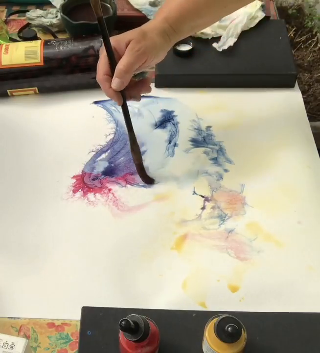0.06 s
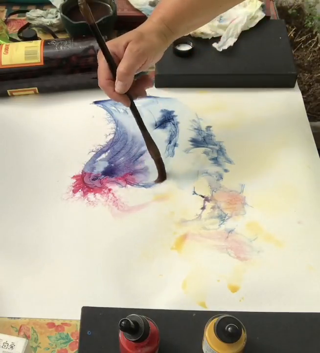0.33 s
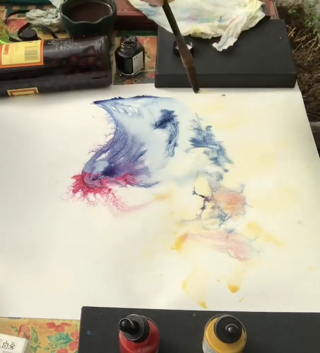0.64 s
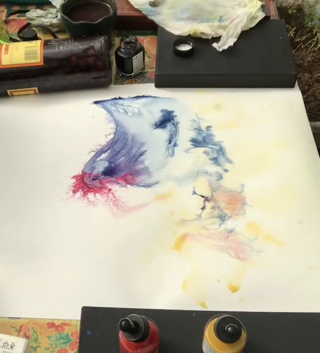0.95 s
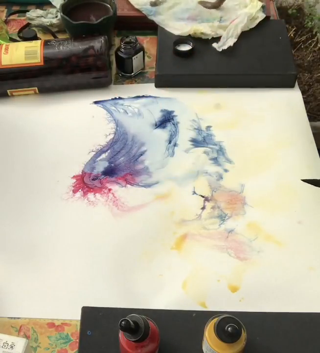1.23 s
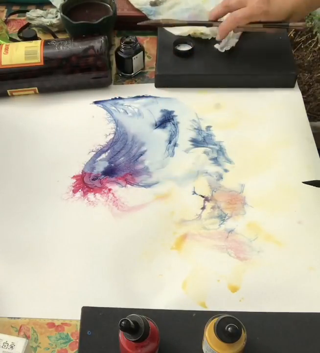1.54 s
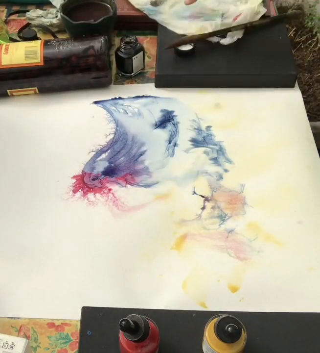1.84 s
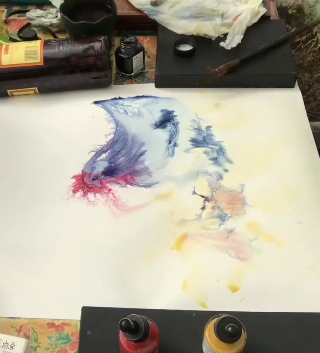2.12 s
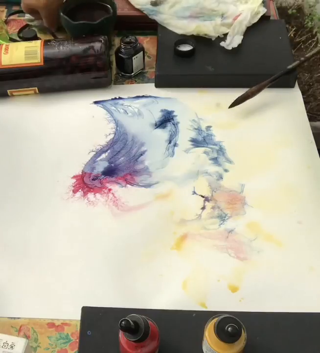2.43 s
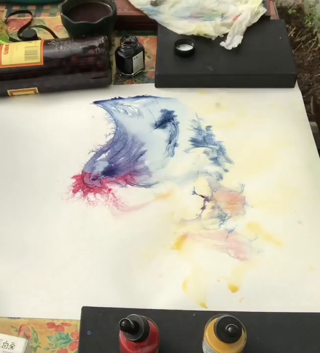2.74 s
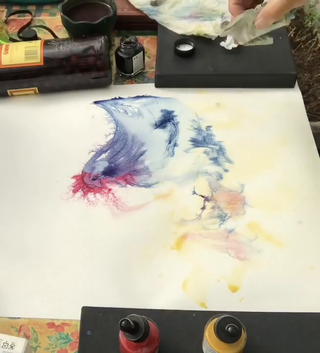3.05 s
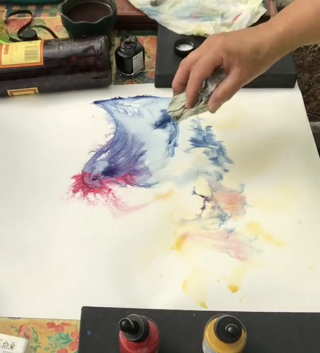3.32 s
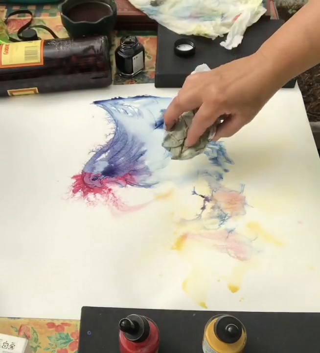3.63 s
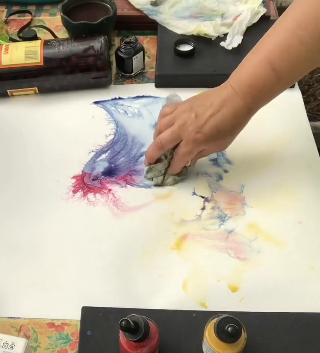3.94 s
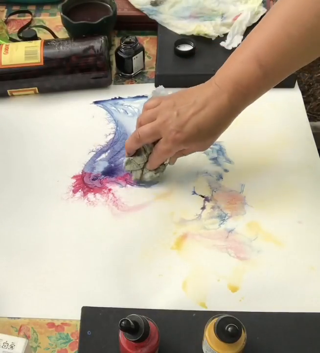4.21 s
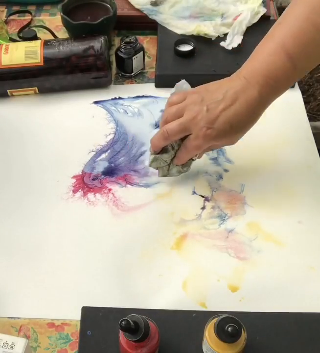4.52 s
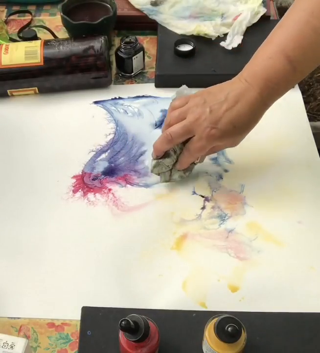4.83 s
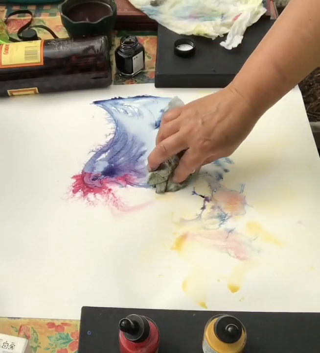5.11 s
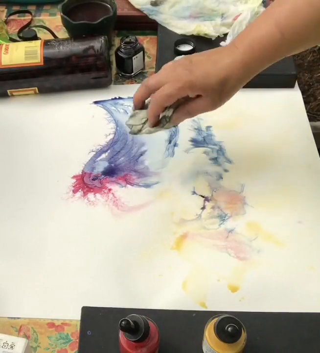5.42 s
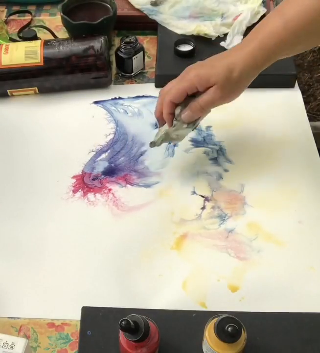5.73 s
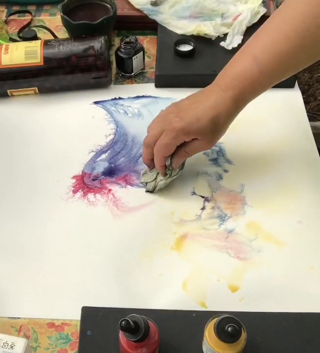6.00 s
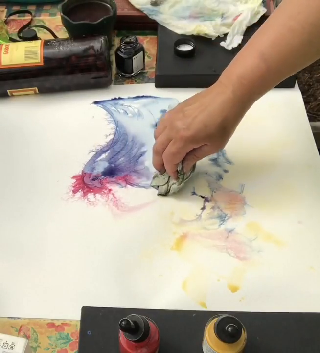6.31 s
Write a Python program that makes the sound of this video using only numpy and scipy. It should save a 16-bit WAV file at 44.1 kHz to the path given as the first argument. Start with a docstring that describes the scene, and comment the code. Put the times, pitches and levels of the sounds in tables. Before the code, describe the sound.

A paintbrush is put down with a thud and clatter on a table, then tissue softly dabs wet paper, outdoors.

```python
"""Painting at an outdoor table, over a distant rumble and a few faint high chirps.
0-0.6 s: soft brush strokes on paper. 1.7-2.1 s: the brush is put down with a thud on the table top,
a clink of its handle on a hard pot and a wooden clack. 2.3-4 s: things are nudged and tapped while a
tissue is wadded, its fibres catching and slipping. 3.7-6.3 s: the tissue dabs the wet paper with small
ticks and, near 6 s, one thin stick-slip squeak."""
import sys
import numpy as np
from scipy import signal
from scipy.fft import rfft, irfft
from scipy.io import wavfile
from scipy.ndimage import uniform_filter1d

SR = 44100
rng = np.random.default_rng(int(sys.argv[2]) if len(sys.argv) > 2 else 0)


def pcm_store(signal):
    """Save signal as 16-bit PCM."""
    levels = np.round(np.clip(np.atleast_2d(signal), -1, 1) * 32767)
    wavfile.write(sys.argv[1], SR, levels.astype(np.int16).T)


N = 280476
TIME_S = np.arange(N) / SR

# outdoor noise spectrum: freq_hz, density_db
AIR_SPECTRUM = [(15, -40), (25, -5.5), (105, -3), (277, -9), (677, -18.5), (911, -21.5), (1040, -19.5),
                (1230, -20.5), (1940, -26), (2160, -25.5), (2610, -29), (2990, -30), (4100, -32),
                (5000, -34.5), (6300, -32.5), (7710, -37), (14400, -40.5), (16000, -39)]
# far machinery: freq_hz, width_hz, level_db
MACHINE_DRONE = [(86, 9, -65), (128.4, 8.8, -68.5), (184, 25, -64.5), (270.6, 64, -66.5)]
# faint chirps: start_s, length_s, pitch_hz, level_db
HIGH_CHIRPS = [(.865, 0.062, 6700, -68), (2.72, 0.063, 11500, -66), (2.74, 0.085, 6580, -60.5),
               (5.708, 0.033, 6460, -58)]

# short bright rustles of hand, cloth and tissue: peak_s, length_s, level_db
SHORT_RUSTLES = [(1.07, 0.046, -60.5), (1.12, 0.074, -64), (1.288, .06, -65), (1.385, 0.15, -62),
                 (1.674, 0.021, -47.5), (1.745, 0.13, -47), (1.856, 0.061, -49.5), (2.525, 0.032, -51),
                 (3.30, 0.074, -49.5), (5.73, 0.037, -65)]
# tissue picked up and wadded: time_s, hiss_db, body_db
TISSUE_WADDING = [(2.284, -74, -66), (2.305, -54.5, -53), (2.38, -53, -62), (2.45, -62.5, -53.5),
                  (2.74, -60.5, -58.5), (2.93, -56, -59), (3.24, -60.5, -55.5), (3.30, -58, -51.5),
                  (3.36, -59.5, -56.5), (3.571, -57.5, -57.5), (3.615, -66, -64)]
# tissue presses, wipes, lifts: peak_s, length_s, level_db
TISSUE_DABS = [(3.72, 0.16, -59), (3.98, 0.15, -53.5), (4.155, 0.095, -57), (4.385, 0.058, -53),
               (4.478, 0.075, -56.5), (4.73, 0.093, -59), (4.86, 0.089, -62), (4.945, 0.059, -61),
               (5.024, 0.026, -57), (5.135, 0.22, -60.5), (5.372, .05, -63), (5.56, 0.26, -57.5),
               (5.80, 0.22, -54), (5.95, 0.14, -59.5), (6.025, 0.044, -48.5), (6.08, 0.19, -59.5),
               (6.235, 0.079, -57.5), (6.308, 0.074, -58.5)]
# bright part of a rub: freq_hz, density_db
RUB_HISS_SPECTRUM = [(1500, -24.5), (2500, -6.5), (3500, -3), (4200, -5), (5000, -8.5), (5900, -7),
                     (6800, -8), (9000, -15), (12000, -16.5), (16000, -19)]
# dull part of a rub: freq_hz, density_db
RUB_BODY_SPECTRUM = [(250, -18.5), (600, 0.5), (1200, 4), (2100, -0.5), (3000, -2), (4500, -17)]
# snaps of cloth and wet tissue: start_s, level_db, pitch_hz, width_hz
TISSUE_SNAPS = [(1.0654, -59, 4000, 9100), (1.2756, -55.5, 6000, 9000), (1.396, -50, 5040, 7000),
                (3.6870, -43, 2400, 3500), (3.807, -51.5, 5010, 9000), (4.712, -54, 4500, 6000),
                (4.776, -54, 4000, 6000), (4.8900, -52.5, 5500, 8000), (5.022, -52, 3200, 4000),
                (5.102, -55, 3500, 5000), (5.376, -54, 4500, 5000), (5.5587, -42, 2930, 4000),
                (5.631, -39, 8460, 3000), (5.6733, -47, 3300, 1500), (5.6817, -45, 3300, 1500),
                (5.726, -38, 2930, 1000), (5.9860, -49, 2700, 700), (6.2273, -46, 2750, 600)]
# course of the squeak: time_s, scrape_db, tone_db, pitch_hz, upper_hz
SQUEAK_GLIDE = [(5.87, -68, -75, 4600, 5600), (5.915, -49, -58, 4560, 5700), (5.924, -46, -44, 4500, 5700),
                (5.937, -44, -45, 4750, 5750), (5.948, -38, -36.5, 4900, 6100),
                (5.962, -42, -37, 4900, 5950), (5.969, -44, -46, 4950, 5850), (5.992, -46, -47, 4800, 5600),
                (6.006, -47, -49, 4560, 5250), (6.019, -52, -38, 4420, 5200), (6.03, -55, -54, 4400, 5200),
                (6.06, -72, -72, 4380, 5200)]
# steady resonances of the squeak: freq_hz, width_hz, level_db
SQUEAK_RESONANCES = [(4450, 260, -12), (5600, 1200, -13), (6200, 300, -12), (7100, 1700, -11),
                     (8000, 900, -14), (8630, 400, -10), (9700, 980, -16.5), (12230, 2500, -17)]

# taps of a hard handle, pitch set by the grip: start_s, level_db, pitch_ratio
HANDLE_TAPS = [(0.8985, -43.5, 0.95), (2.6257, -29, 0.98), (2.6794, -27.5, 0.93), (2.8083, -38.5, 1.04),
               (5.036, -39, 0.76)]
# hollow ring of the handle: freq_hz, level_db, t60_s
HANDLE_MODES = [(1026, 2, 0.016), (1340, -2, .02), (1680, -6, .012), (2400, -13, .008),
                (2980, -3.5, 0.0072), (5300, -7, .003)]
# contact of handle and pot: freq_hz, density_db
CLINK_SPECTRUM = [(1500, -44.5), (2300, -31), (2800, -8), (3300, -9), (3900, 2), (4500, 1.5), (5200, -19),
                  (6200, -6.5), (7000, -19), (7900, -12.5), (8800, -28.5), (10200, -15.5), (13400, -33.5),
                  (16000, -31)]
# ring of the pot: freq_hz, level_db, t60_s
POT_MODES = [(2640, -22, 0.26), (2982, -17, 0.26), (3520, -19, 0.21), (3770, -11, .22), (3900, 0, 0.12),
             (3870, -12.5, 0.2), (4200, -12, .28), (4314, -8, .3), (4373, -12.5, 0.273), (4470, -7, .25),
             (4520, -9.5, .28), (4730, -10, .22), (5276, -19.5, .25), (6120, -7, 0.14), (6218, -15, 0.24),
             (6540, -18.5, 0.12), (7400, -25.5, .2), (7960, -18.5, 0.25), (9020, -24, 0.16),
             (10200, -21, .12), (12240, -25.5, .14), (15400, -28, .1)]

# blows on the table: start_s, force_db, contact_ms, bass_db, rattle_db, t60_ratio, tool_hz, tool_db
TABLE_BLOWS = [(1.0652, -54, .2, 0, -7, 1.1, 520, 9), (1.6864, -12, 0.42, 4.5, -4.5, 1.22, 3800, 9),
               (1.832, -25, 0.82, -34, -3, 1.4, 560, 8), (1.8420, -30, 0.94, -22, -5, 0.92, 950, 10),
               (1.8846, -22, 1, -24, -2, 1, 597, 5.5), (1.9099, -26, 0.43, -15, 3.5, 0.84, 1400, 1),
               (1.9203, -14, 0.26, -3, -6, 0.76, 1530, 6), (1.9362, -28, 0.27, -8, 1, 0.54, 1700, 1),
               (1.9470, -23, 0.59, 2, -1, 0.93, 650, 4), (1.9842, -26, 0.56, -10, -3, 0.85, 500, 6),
               (1.9912, -23.5, 0.48, -3, -3, 0.97, 500, 7.5), (2.0413, -4.5, 0.32, -4, -10, 0.57, 2490, 9),
               (2.0512, -23, 0.36, -6, -0.5, 1.2, 426, 9.5), (2.2610, -37.5, 1.24, 2, 7.5, 1, 450, 1.5),
               (2.3070, -37.5, 1, -4, 6.5, 1, 400, 5), (2.3660, -47.5, 0.098, 0, 11.5, 0.93, 130, 13),
               (2.4050, -41, 0.7, 5, 5, 0.85, 600, 7), (2.6877, -35.5, 0.27, 15, -3, 0.99, 317, 5),
               (3.1083, -24.5, 0.22, 3, -2, 0.64, 235, 7), (3.1460, -22.5, 0.62, 8, -10.5, 0.52, 654, 7),
               (3.1551, -34, 0.35, 11, -1, 0.57, 500, 3.5), (3.1964, -39.5, .2, 8, -1, 0.65, 1910, 12),
               (3.5130, -42.5, 0.26, 15, 0.5, 0.61, 1700, 6), (3.9624, -42.5, 0.12, -16, -5, 1.1, 2000, 7),
               (3.9896, -37.5, 0.27, -17, -6, 0.92, 1096, 6), (6.0270, -38, .2, -3.5, -6.5, 0.65, 980, 8.5)]
# table top with its load: freq_hz, level_db, t60_s
TABLE_MODES = [(127.8, -31.5, 0.28), (277, -7.5, 0.028), (365, -1.5, 0.039), (526, -1, 0.024),
               (660, -5, 0.024), (878, -5.5, 0.026), (1140, -4, 0.029), (1556, -2.5, 0.02),
               (2070, -5.5, 0.014), (2750, -3, 0.01185), (3550, -2.5, 0.007), (4400, -5.5, 0.009),
               (6300, -11.5, 0.016), (8620, -10, 0.0026), (11960, -19, 0.0023)]
# dense after-rattle of table and surroundings: freq_hz, density_db, t60_s
RATTLE_BANDS = [(30.4, -41.5, .5), (69.4, -35, 0.34), (151, -16, 1), (250, -5.5, 0.55), (450, -6, 0.55),
                (745, -6, 0.44), (1060, -8, 0.47), (1482, -10.5, 0.36), (1995, -15, 0.34), (2700, -16, .38),
                (3980, -19, 0.34), (7000, -12.5, 0.23), (15040, -31.5, 0.11)]
# boards and boxes on the table: freq_hz, level_db, t60_s
BOARD_MODES = [(297, -15.5, 0.39), (365.7, -8, 0.33), (426, -13.5, .5), (469, -11, .38), (525, -10, .4),
               (634, -13, 0.39), (739, -16, .27), (850, -13.5, 0.29), (970, -17, .43), (1140, -12.5, .3),
               (1360, -17.5, .4), (1580, -18.5, 0.36)]


def amp(db):
    """Decibels to gain."""
    return np.exp(np.asarray(db) * (np.log(10) / 20))


def unit(x):
    """Scale to rms 1."""
    return x / np.sqrt(np.mean(x ** 2) + 1e-20)


def lookup(table, hz, column=1):
    """Interpolate a table column over log frequency."""
    columns = np.transpose(table)
    return np.interp(np.log(hz + 1), np.log(columns[0] + 1), columns[column])


def add(mix, start_s, sound):
    """Mix a sound in at start_s."""
    part = mix[round(start_s * SR):][:len(sound)]
    part += sound[:len(part)]


def colour(x, spectrum):
    """Filter by a spectrum; rms 1."""
    gain = amp(lookup(spectrum, np.fft.rfftfreq(len(x), 1 / SR)))
    return unit(irfft(rfft(x) * gain, len(x)))


def click(spectrum, size=1024):
    """Minimum-phase pulse of a spectrum; peak 1."""
    log_gain = np.log(amp(lookup(spectrum, abs(np.fft.fftfreq(size, 1 / SR)))))
    pulse = np.fft.ifft(np.exp(np.conj(signal.hilbert(log_gain)))).real
    return pulse / abs(pulse).max()


def resonate(x, hz, width_hz):
    """Steep resonance; its centre may move."""
    carrier = np.exp(2j * np.pi * np.cumsum(hz * np.ones(len(x))) / SR)
    pole = np.exp(-np.pi * width_hz / SR)
    baseband = signal.lfilter([(1 - pole) ** 2], [1, -2 * pole, pole * pole], x / carrier)
    return 2 * (carrier * baseband).real


def narrow_noise(hz, width_hz, size):
    """Noise through one resonance; rms 1."""
    return unit(resonate(rng.standard_normal(size), hz, width_hz))


def wander(rate_hz, size=N):
    """Smooth random curve, low-passed at rate_hz; rms 1."""
    rolloff = 1 + (np.fft.rfftfreq(size, 1 / SR) / rate_hz) ** 4
    return unit(irfft(rfft(rng.standard_normal(size)) / rolloff, size))


def echo_tail(spectrum, decays, rise_s, size=16384):
    """Dense echoes swell, then die band by band. Rows of decays: freq_hz first, t60_s last."""
    noise = colour(rng.choice([-1., 1.], size), spectrum)
    hz, t, bands = signal.stft(noise, SR, nperseg=512)
    t60_s = lookup(decays, hz, column=-1)[:, None]
    echoes = signal.istft(bands * amp(-60 * t / t60_s), SR, nperseg=512)[1][:size]
    return echoes * (1 - np.exp(-(np.arange(size) / SR / rise_s) ** 2))


def outdoors(air_db=-55.5, swell_db=1.8, rumble_below_hz=350):
    """Distant rumble swells under a steady hiss; far machinery drones."""
    air = amp(air_db) * colour(rng.standard_normal(N), AIR_SPECTRUM)
    rumble = irfft(rfft(air) / (1 + (np.fft.rfftfreq(N, 1 / SR) / rumble_below_hz) ** 4), N)
    swell = amp(swell_db * wander(rate_hz=8))
    drone = sum(amp(db) * narrow_noise(hz, width_hz, N) for hz, width_hz, db in MACHINE_DRONE)
    return air + rumble * (swell - 1) + drone


def chirps(width_hz=350):
    """Thin fuzzy tones that swell and fade."""
    out, t = np.zeros(N), np.arange(SR // 4) / SR
    for start_s, length_s, hz, db in HIGH_CHIRPS:
        envelope = np.sin(np.pi * np.minimum(t / length_s, 1))
        add(out, start_s, amp(db) * envelope * narrow_noise(hz, width_hz, len(t)))
    return out


def brush_strokes(count=7, first_s=0.045, period_s=0.0828, length_s=0.075, first_db=-72, step_db=1):
    """Brush works to and fro, pressing harder each time. Rows: peak_s, length_s, level_db."""
    return [(first_s + k * period_s, length_s, first_db + k * step_db) for k in range(count)]


def rub_power(rubs, rise_share=0.39, edge_db=12, roundness=1.34):
    """Power envelope of a set of rubs: quick rise, slower fade."""
    power = np.zeros(N)
    for peak_s, length_s, db in rubs:
        near = abs(TIME_S - peak_s) < 2 * length_s
        offset = (TIME_S[near] - peak_s) / length_s
        distance = np.maximum(-offset / rise_share, offset / (1 - rise_share))
        power[near] += amp(db - edge_db * distance ** roundness) ** 2
    return power


def crinkle(centre_hz=2000, width_hz=800, drift_octaves=0.19, folds_per_s=500, spread_db=2.5):
    """Tissue folds buckle and ring; the pitch drifts as the wad changes shape."""
    folds = rng.choice([-1., 1.], N) * (rng.random(N) < folds_per_s / SR)
    folds *= amp(spread_db * np.minimum(rng.exponential(1, N), 4))
    pitch_hz = centre_hz * 2 ** (drift_octaves * wander(rate_hz=9))
    return unit(resonate(folds, pitch_hz, width_hz))


def rubbing(hiss_db=-1, body_db=-3, crinkle_db=-7, spread_db=1.5, clump_db=1.25, slips_per_s=4000):
    """Brush, cloth and tissue fibres catch and slip in clumps: bright hiss, dull body, crinkle."""
    times_s, *levels_db = np.transpose(TISSUE_WADDING)
    hiss_power, body_power = (amp(np.interp(TIME_S, times_s, db, left=-np.inf, right=-np.inf)) ** 2
                              for db in levels_db)
    for rubs, body_over_hiss_db in [(brush_strokes(), 3), (SHORT_RUSTLES, -5), (TISSUE_DABS, 2)]:
        power = rub_power(rubs)
        hiss_power += power
        body_power += power * amp(body_over_hiss_db) ** 2
    clumps = amp(clump_db * wander(rate_hz=35))
    out = np.zeros(N)
    for spectrum, power, db in [(RUB_HISS_SPECTRUM, hiss_power, hiss_db),
                                (RUB_BODY_SPECTRUM, body_power, body_db)]:
        slips = rng.standard_normal(N) * (rng.random(N) < slips_per_s / SR)
        slips *= clumps * amp(spread_db * np.minimum(rng.exponential(1, N), 5))
        out += amp(db) * np.sqrt(power) * colour(slips, spectrum)
    return out + amp(crinkle_db) * np.sqrt(body_power) * crinkle()


def tissue_ticks(spray_db=-15, decay_s=0.0023):
    """Each snap: a short puff through one resonance, plus broadband spray."""
    out, t = np.zeros(N), np.arange(4096) / SR
    for start_s, db, hz, width_hz in TISSUE_SNAPS:
        noise = rng.standard_normal(len(t))
        puff = unit(resonate(noise, hz, width_hz)) + amp(spray_db) * noise
        add(out, start_s, amp(db) * np.exp(-t / decay_s) * puff)
    return out


def squeak(width_hz=280, lower_db=-6, upper_db=-10, rings_db=-2, rasp_db=2, jitter_hz=90):
    """Stick-slip contact: two rough gliding tones stutter over steady high resonances."""
    times_s, *columns = np.transpose(SQUEAK_GLIDE)
    out, size = np.zeros(N), SR // 4
    t = times_s[0] + np.arange(size) / SR
    scrape_db, tone_db, pitch_hz, upper_hz = (np.interp(t, times_s, column) for column in columns)
    pitch_hz += jitter_hz * wander(rate_hz=250, size=size)
    lower = amp(lower_db + tone_db) * narrow_noise(pitch_hz, width_hz, size)
    rings = sum(amp(db) * narrow_noise(hz, band_hz, size) for hz, band_hz, db in SQUEAK_RESONANCES)
    upper = amp(upper_db) * narrow_noise(upper_hz, width_hz, size)
    scrape = amp(scrape_db) * (amp(rings_db) * rings + upper)
    rasp = unit(amp(rasp_db * wander(rate_hz=180, size=size)))
    add(out, times_s[0], (t < times_s[-1]) * rasp * (lower + scrape))
    return out


def handle_taps(attack_s=0.00029, echo_db=-18, echo_t60_s=0.18):
    """Light taps ring the handle; the surroundings answer faintly."""
    out, t = np.zeros(N), np.arange(4096) / SR
    echo_spectrum = [(500, -10), (1100, 3), (3000, -9), (9000, -33)]  # freq_hz, density_db
    for start_s, tap_db, pitch_ratio in HANDLE_TAPS:
        ring = sum((-1) ** k * amp(db - 60 * t / t60_s) * np.sin(2 * np.pi * pitch_ratio * hz * t)
                   for k, (hz, db, t60_s) in enumerate(HANDLE_MODES))
        add(out, start_s, amp(tap_db) * ring * (1 - np.exp(-t / attack_s)))
        echo = echo_tail(echo_spectrum, [(1000, echo_t60_s)], rise_s=0.0019)
        add(out, start_s, amp(tap_db + echo_db) * echo)
    return out


def pot_clink(start_s=1.9207, bounces=6, gap_s=0.0007, loss_db=2,
              crack_db=-5, ring_db=-26, echo_db=-31, wobble_hz=12):
    """The handle chatters on the pot, each bounce weaker; the pot rocks, so its modes waver."""
    out, t = np.zeros(N), np.arange(SR // 2) / SR
    for k in range(bounces):
        bounce_s = start_s + gap_s * (k + 0.5 * rng.random())
        add(out, bounce_s, amp(crack_db - loss_db * k) * click(CLINK_SPECTRUM))
    for hz, db, t60_s in POT_MODES:
        detune_hz = wobble_hz * unit(uniform_filter1d(rng.standard_normal(len(t)), size=400))
        cycles = np.cumsum(hz + detune_hz) / SR + rng.random()
        add(out, start_s, amp(ring_db + db - 60 * t / t60_s) * np.sin(2 * np.pi * cycles))
    echo = echo_tail(CLINK_SPECTRUM, decays=[(4500, 0.42), (10000, 0.26)], rise_s=0.0041)
    add(out, start_s, amp(echo_db) * echo)
    return out


def blow_db(hz, force_db, contact_ms, bass_db, tool_hz, tool_db,
            slope_db_per_octave=9, bass_below_hz=293, tool_width_octaves=0.32):
    """Blow spectrum: long contact cuts treble, weight adds bass, the tool stresses its own pitch."""
    corner_hz = 500 / contact_ms
    softness_db = slope_db_per_octave * np.log2(np.hypot(1, hz / corner_hz))
    weight_db = bass_db / (1 + (hz / bass_below_hz) ** 4)
    near_tool = np.exp(-(np.log2((hz + 1) / tool_hz) / tool_width_octaves) ** 2)
    return force_db - softness_db + weight_db + tool_db * near_tool


def table_knocks(after_db=-10, boards_db=-1, snap_db=-11, snap_below_ms=0.57,
                 attack_s=0.0001, rise_s=0.0022, low_cut_hz=85):
    """Blows ring the table top; boards and boxes rattle on. Short contacts add a bright snap."""
    out = np.zeros(N)
    snap = click(spectrum=[(1500, -32.5), (5000, 3.5), (9000, -8), (16000, -10.5)])
    response = echo_tail(RATTLE_BANDS, RATTLE_BANDS, rise_s)
    t = np.arange(len(response)) / SR
    bins_hz = np.fft.rfftfreq(len(t), 1 / SR)
    for start_s, force_db, contact_ms, bass_db, rattle_db, t60_ratio, tool_hz, tool_db in TABLE_BLOWS:
        blow = force_db, contact_ms, bass_db, tool_hz, tool_db
        rattle = irfft(rfft(response) * amp(blow_db(bins_hz, *blow)))
        boards = sum(amp(db + blow_db(hz, *blow) - 60 * t / t60_s)
                     * np.sin(2 * np.pi * (hz * t + rng.random())) for hz, db, t60_s in BOARD_MODES)
        rattle += amp(boards_db) * boards * (1 - np.exp(-t / rise_s))
        # adjacent modes swing in antiphase; a tool left in contact damps them
        ring = sum((-1) ** k * amp(db + blow_db(hz, *blow) - 60 * t / (t60_s * t60_ratio))
                   * np.sin(2 * np.pi * hz * t) for k, (hz, db, t60_s) in enumerate(TABLE_MODES))
        add(out, start_s, ring * (1 - np.exp(-t / attack_s)) + amp(after_db + rattle_db) * rattle)
        hardness = 1 / (1 + (contact_ms / snap_below_ms) ** 6)
        add(out, start_s, amp(snap_db + force_db) * hardness * snap)
    # low cut keeps sub-bass boom out of the knocks
    return signal.sosfilt(signal.butter(2, low_cut_hz, "high", fs=SR, output="sos"), out)


def scene():
    """Mono sum at a microphone above the table."""
    impacts = table_knocks() + handle_taps() + pot_clink()
    friction = rubbing() + tissue_ticks() + squeak()
    return (impacts + friction + chirps() + outdoors())[None]


def record(dry, notch_hz=10600, notch_width_hz=600, notch_db=-3,
           low_cut_hz=34, ceiling=0.75, high_cut_hz=16000):
    """Microphone: shallow treble notch, low cut, rounded peaks, band limit."""
    hz = np.fft.rfftfreq(N, 1 / SR)
    notch = amp(notch_db * np.exp(-((hz - notch_hz) / notch_width_hz) ** 2))
    heard = irfft(rfft(dry) * notch, N)
    heard = signal.sosfilt(signal.butter(3, low_cut_hz, "high", fs=SR, output="sos"), heard)
    heard = ceiling * np.tanh(heard / ceiling)
    lowpass = signal.firwin(511, high_cut_hz, window=("kaiser", 9), fs=SR)
    return signal.oaconvolve(heard, lowpass[None], "same")


dry = scene()
out = record(dry)
pcm_store(out)
```